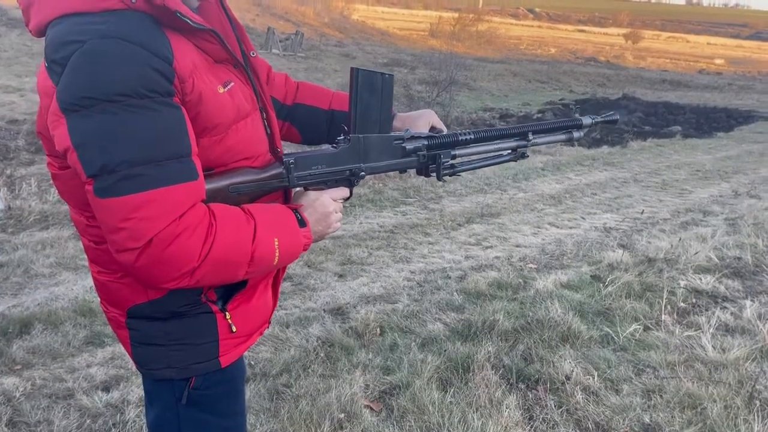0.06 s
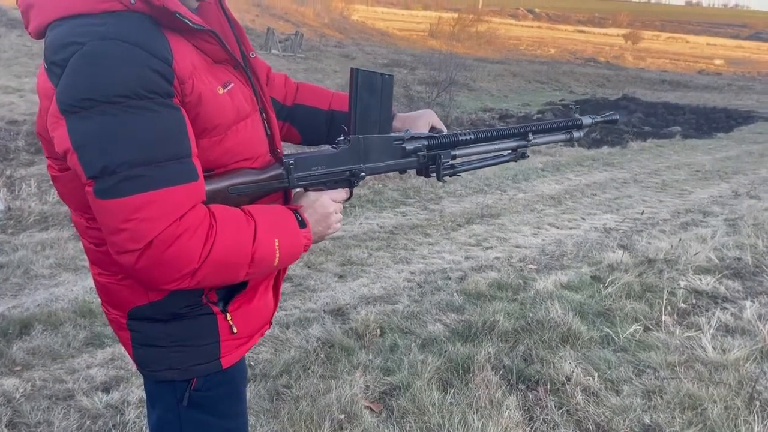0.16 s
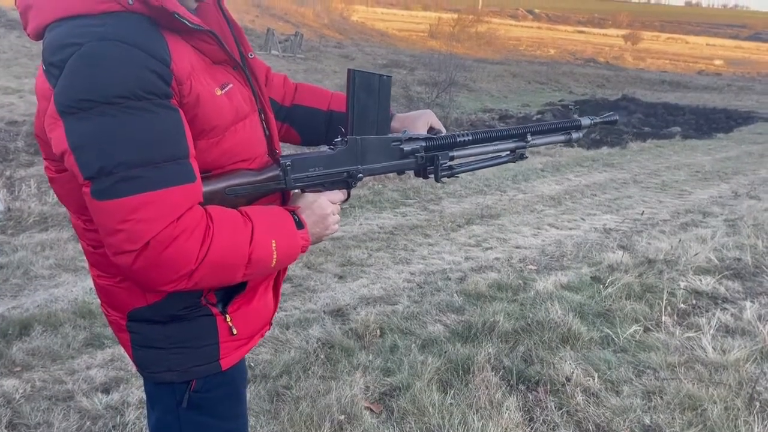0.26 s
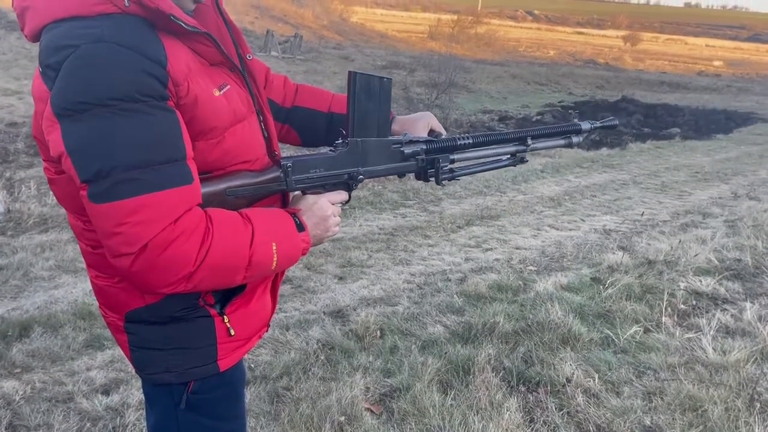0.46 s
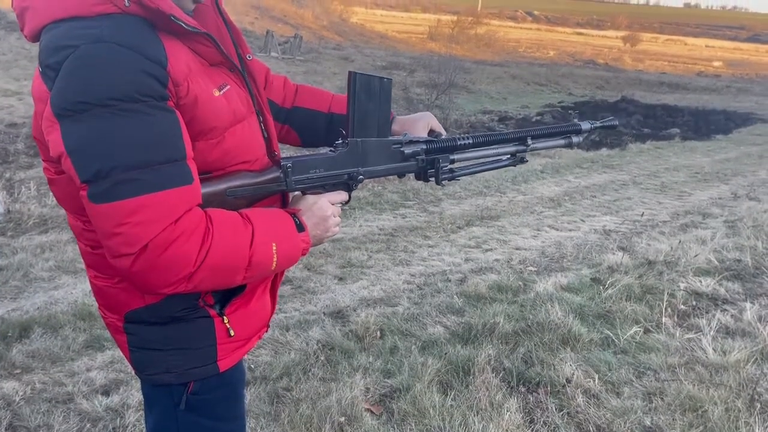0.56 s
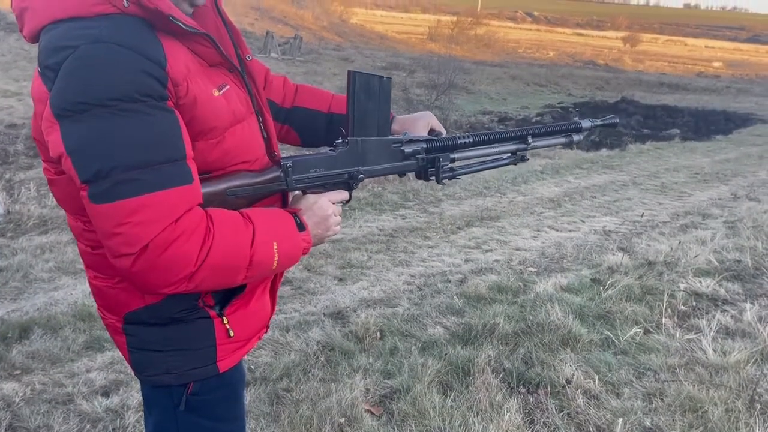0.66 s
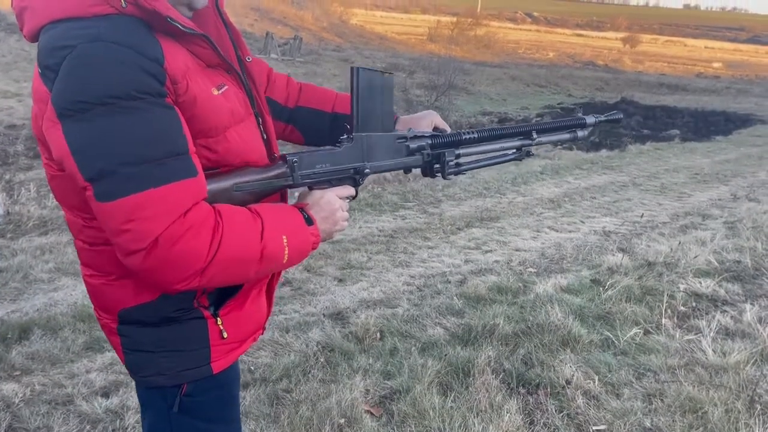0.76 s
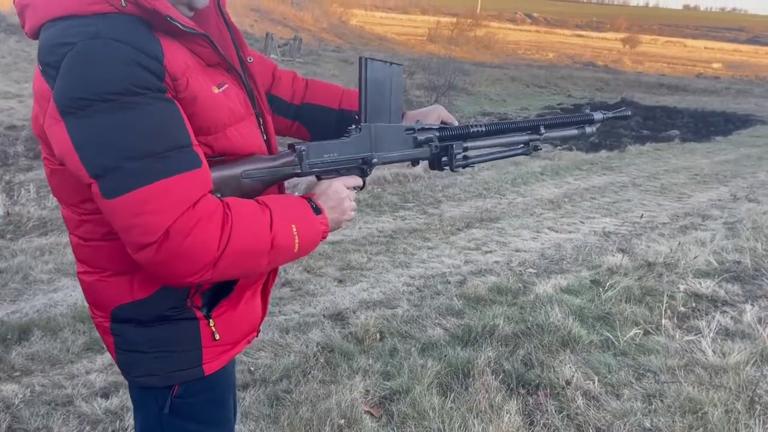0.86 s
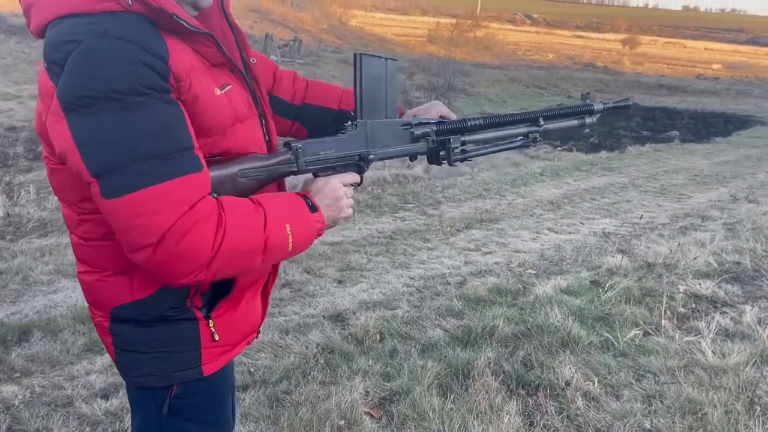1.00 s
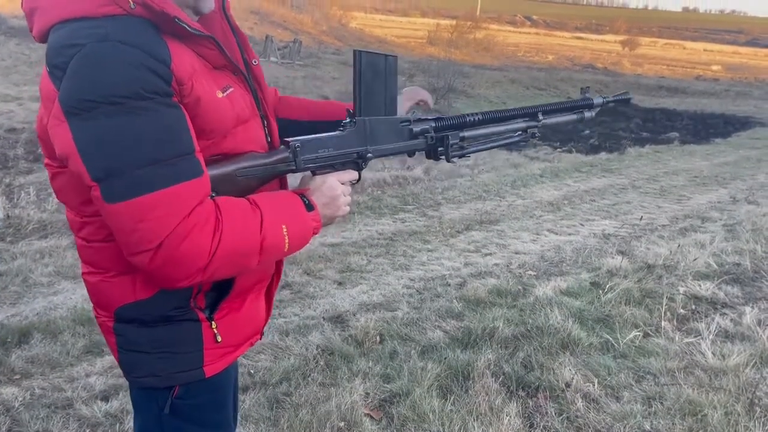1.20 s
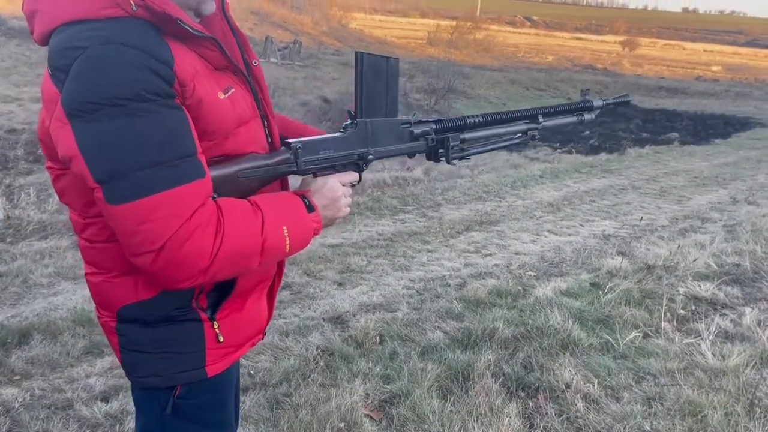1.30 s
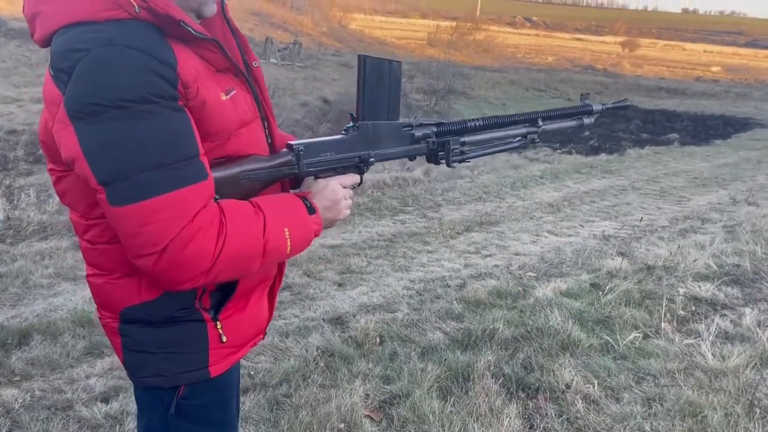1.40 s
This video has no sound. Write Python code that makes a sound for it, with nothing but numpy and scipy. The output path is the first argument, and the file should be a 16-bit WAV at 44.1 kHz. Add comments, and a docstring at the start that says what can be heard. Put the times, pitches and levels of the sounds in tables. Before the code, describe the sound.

A light machine gun fires one close shot, a sharp crack and thump wrapped in steel bolt clatter. A dull echo fades across the open field, a spent case ticks faintly in grass, and wind rumbles on the microphone.

```python
"""Wind rumbles on the microphone in an open field, over the dying echo and ring of an earlier shot.
Close by, a light machine gun fires one round from an open bolt: the sear trips, the bolt runs forward
and locks, and each impact excites the modes of the steel receiver. Expanding gas blasts from the
muzzle and the bolt flies back. Far slopes scatter the shot back, dulled by absorption in the air,
and the spent case ticks faintly in the grass."""
import sys
import numpy as np
from scipy import signal
from scipy.fft import rfft, irfft
from scipy.io import wavfile
from scipy.ndimage import uniform_filter1d, map_coordinates

SR = 44100
rng = np.random.default_rng(int(sys.argv[2]) if len(sys.argv) > 2 else 0)


def store_wav(level_fs):
    """Save 16-bit WAV to argv[1]."""
    pcm = np.round(np.clip(np.atleast_2d(level_fs), -1, 1) * 32767)
    wavfile.write(sys.argv[1], SR, pcm.T.astype(np.int16))


N = 63945

# Rise and decay times are exponential time constants; density_db is a relative level per hertz.
# Course of the wind's rumble: time_s, level_db
GUSTS = [(0, -52), (.1, -51.5), (0.149, -43.5), (0.199, -48.5), (.35, -46), (.47, -47.5), (0.581, -54),
         (0.651, -49), (.76, -48.5), (.82, -64), (0.912, -57), (0.962, -52), (1.04, -61.5), (1.12, -69),
         (1.18, -51.5), (1.29, -49), (1.39, -54), (1.45, -52)]
# Single eddies striking the microphone: start_s, level_db, decay_s, tilt_db_per_octave
BUFFET_HITS = [(.138, -35, 0.01, -1.5), (0.328, -41, 0.033, 3), (0.623, -47.5, .012, -0.5),
               (.654, -52, .02, -6.5), (0.7388, -33, 0.0031, 1), (.748, -37, .007, 0),
               (0.945, -41.5, 0.0071, -8), (0.964, -44.5, .012, -7), (1.148, -43.5, 0.0054, -1),
               (1.181, -50, 0.0076, -10.5), (1.258, -50, 0.0095, 1.5), (1.333, -52, 0.025, 6),
               (1.394, -54, 0.0041, 4), (1.419, -54.5, 0.012, -4.5)]
# Spectra of the rumble, the buffets and the flutter of finer eddies: frequency_hz, density_db
RUMBLE_SPECTRUM = [(20, -14.5), (50, -7), (85, 1.5), (150, -2.5), (220, -7.5), (320, -23.5), (550, -42),
                   (2000, -71)]
BUFFET_SPECTRUM = [(60, -11), (180, -0.5), (350, 4), (500, -2.5), (700, -18.5), (1000, -35.5), (2000, -70)]
FLUTTER_SPECTRUM = [(100, -11.5), (190, -0.5), (300, -5.5), (450, -11), (700, -25.5), (1100, -40),
                    (2000, -61)]
FLUTTER_DB, GUST_DB, FLUTTER_DB_PER_DB = -57.5, -46.5, 1.4  # flutter at this gust level; its growth

# Reflections from the land: delay_s, level_db, rise_s, decay_s, tilt_db_per_octave
REFLECTIONS = [(0.057, -48, .02, .06, 4), (.168, -47, 0.009, .03, -1.5), (.193, -48.5, 0.0185, 0.046, -1),
               (.245, -53, 0.018, 0.093, -2.5), (0.389, -68, 0.0061, .03, -1), (0.599, -76.5, .1, 0.2, -2)]
# Spectrum of the reflections: frequency_hz, density_db
LAND_SPECTRUM = [(100, -9), (200, 1.5), (330, -6), (600, 2), (1080, 4), (1550, -1), (2250, -1.5),
                 (3400, -8), (6000, -12.5), (9000, -11.5), (10200, -31), (11300, -20.5)]
AIR_DB_PER_S_KHZ, PATCH_DB, PATCH_S = 0.5, 2, .008  # absorption; depth and length of uneven patches
EARLIER_SHOT_S, EARLIER_GAIN_DB, SHOT_S = -0.24, 2, .2655

# Impacts in the action: start_s, level_db, attack_s, decay_s, tilt_db_per_octave, left_over_right_db
IMPACTS = [(0.147, -60.5, 0.0041, 0.018, -5.5, 1.5), (0.2013, -33.5, .0006, 0.006, -2, 2.5),
           (0.2134, -19, 0.0007, 0.002, 12.5, -1), (0.2158, -23.5, 0.0024, .003, 1.5, -0.5),
           (0.2231, -33, .001, .003, -0.5, -1.5), (.2284, -29.5, .001, 0.0045, -1.5, 5),
           (.236, -29, .002, .009, -3.5, 1.5), (0.2437, -11.5, 0.0018, 0.0031, 8, 1.5),
           (.2490, -26.5, 0.0013, .0025, 2.5, 2), (0.2948, -29, .001, 0.001, -6, 1),
           (0.306, -26, 0.0018, 0.0036, 2, 3), (0.3175, -36.5, 0.00093, .004, -2.5, 3)]
# Spectrum of steel striking steel: frequency_hz, density_db
STEEL_SPECTRUM = [(200, -14), (700, -9), (2300, -2.5), (3900, -5), (5700, -4), (7200, -3), (9000, -0.5),
                  (10600, -3.5), (11500, -3.5), (12500, -27)]
# Modes of the receiver: pitch_hz, level_db
RECEIVER_MODES = [(1933, -8), (2537, -6.5), (3548, -11.5), (4721, -9.5), (5700, -10.5), (6341, -2.5),
                  (7666, -5.5), (8222, -1.5), (8690, 2.5), (9600, -6.5), (11200, -0.5)]
RECEIVER_DB, RECEIVER_T60_S = -9, .07  # level relative to the impacts
# Thin after-ring of the steel: start_s, level_db
AFTER_RINGS = [(-.28, -56.5), (0.2456, -87.5)]
RING_HZ, RING_T60_S, CONTACT_ATTACK_S = 5360, 1.7, 0.00042

# Spectra of the muzzle's roar and crack: frequency_hz, density_db
ROAR_SPECTRUM = [(150, -21), (330, -12.5), (480, 5), (620, -2), (800, -3), (1050, -2), (1500, -8),
                 (1950, -9.5), (2700, -15), (4000, -23), (9000, -37)]
CRACK_SPECTRUM = [(1500, -21.5), (3000, -1), (4300, -3.5), (6400, 2), (7300, -4), (8400, 6), (10000, -7),
                  (11400, 3.5), (12300, -19.5)]
ROAR_DB, CRACK_DB, SHOCKS_PER_S, SHOCK_SCATTER_DB = -12, -16.5, 5000, 1
# Resonances that bark through the roar: pitch_hz, level_db
BARK_MODES = [(714, -25.5), (1038, -17.5), (1194, -27.5), (1344, -29), (1933, -26.5)]
# Low resonances of the blast: pitch_hz, level_db, decay_s
THUMP_MODES = [(456.2, -12.5, 0.0032), (221.4, -4.5, .007), (183.7, -24, .022), (90, -8, 0.0091)]
THUMP_LAG_CYCLES = 0.84  # the lower the mode, the later it starts
PUSH_LAG_S, PUSH_S, PUSH_DB, PUSH_CUTOFF_HZ = .0075, .0095, -12.5, 86

# Contacts of the case with the grass: start_s, level_db, decay_s, tilt_db_per_octave
CASE_TICKS = [(.833, -68, 0.0058, 3), (0.8742, -49.5, .003, -5), (1.077, -71, 0.0073, -10.5),
              (1.276, -79.5, .004, -6)]
# Spectrum of one contact: frequency_hz, density_db
TICK_SPECTRUM = [(250, -8), (450, -6), (900, 4.5), (2000, -1.5), (3500, 4.5), (5000, -12.5), (12000, -28)]
# Modes of the brass case: pitch_hz, level_db
BRASS_MODES = [(880, 4.5), (1470, 0), (1850, -8), (2420, -7.5), (3050, -3), (3600, -8)]
CASE_RING_DB, CASE_DECAY_S = -13, 0.0089  # level relative to the tick

MUZZLE_LAG_S, ACTION_LAG_S, LAND_LAG_S = .0004, .000048, .00041  # delays at the left microphone port
HISS_DB, MONO_BELOW_HZ, TOP_HZ = -108, 260, 11950


def undb(db):
    """Amplitude ratio of a level in decibels."""
    return 10 ** (np.asarray(db) / 20)


def unit(x):
    """Normalisation to rms 1."""
    return x / np.sqrt(np.mean(x ** 2))


def since(start):
    """Time axis in seconds, zero at start."""
    return np.arange(N) / SR - start


def colour(x, spectrum, tilt_db=0):
    """Filtering by a spectrum tilted per octave; the result has rms 1."""
    hz, db = np.array(spectrum, float).T
    size = 2 ** 16
    octave = np.log2(np.maximum(np.fft.rfftfreq(size, 1 / SR), 1))
    gain = undb(np.interp(octave, np.log2(hz), db + tilt_db * np.log2(hz / hz[0])))
    return unit(irfft(rfft(x, size) * gain)[..., :N])


def pair(mid_side, correlation):
    """Sum and difference of two independent signals give left and right a set correlation."""
    mid, side = mid_side
    return np.sqrt((1 + correlation) / 2) * mid + np.sqrt((1 - correlation) / 2) * side * [[1], [-1]]


def noise(correlation):
    """Partly coherent stereo white noise."""
    return pair(rng.standard_normal((2, N)), correlation)


def pan(db):
    """Gains for a level difference of left over right."""
    return undb(np.array([[db], [-db]]) / 2)


def delay_left(x, lag_s):
    """Path difference: sound from the right reaches the left port late."""
    return np.array([map_coordinates(x[0], [since(lag_s) * SR], mode="nearest"), x[1]])


def steady(x, window_s):
    """Division by the running rms evens out the slow level of a noise."""
    span = int(window_s * SR)
    power = uniform_filter1d(uniform_filter1d(x ** 2, span), span // 2)
    return x / np.sqrt(power + 1e-9)


def strike(start, attack_s, decay_s):
    """Envelope of a damped impact: rounded attack, exponential decay."""
    t = since(start)
    onset = np.sin(np.pi / 2 * np.clip(t / attack_s, 0, 1)) ** 2
    return onset * np.exp(-np.maximum(t - attack_s, 0) / decay_s)


def swell(peak, rise_s, decay_s):
    """Exponential growth to a peak, then exponential decay."""
    t = since(peak)
    return np.exp(np.minimum(t / rise_s, -t / decay_s))


def burst(source, envelope, spectrum, tilt_db=0):
    """Source and filter: an enveloped excitation is coloured and takes the envelope's rms."""
    return colour(source * envelope, spectrum, tilt_db) * np.sqrt(np.mean(envelope ** 2))


def modal_sum(modes, t, channels):
    """Superposition of undamped modes, with random phases in each channel."""
    return sum(undb(db) * np.sin(2 * np.pi * (hz * t + rng.random((channels, 1)))) for hz, db in modes)


def wind():
    """Turbulent pressure on the microphone: rumble, dull buffets and a flutter that grows in gusts."""
    gust_db = np.interp(since(0), *np.array(GUSTS).T)
    rumble = steady(colour(rng.standard_normal(N), RUMBLE_SPECTRUM), window_s=0.042) * undb(gust_db)
    eddies = noise(correlation=0.691)
    buffets = 0
    for start, db, decay, tilt in BUFFET_HITS:
        envelope = strike(start, attack_s=0.00071, decay_s=decay)
        buffets += undb(db) * burst(eddies, envelope, BUFFET_SPECTRUM, tilt)
    flutter_db = FLUTTER_DB + FLUTTER_DB_PER_DB * (gust_db - GUST_DB)
    flutter = colour(noise(correlation=.8), FLUTTER_SPECTRUM) * undb(flutter_db)
    return rumble + flutter + buffets


def echo(shot_s):
    """Diffuse reflection from uneven land; air absorption grows with frequency and path length."""
    patches = undb(PATCH_DB * unit(uniform_filter1d(rng.standard_normal(N), int(PATCH_S * SR))))
    scatter = delay_left(noise(correlation=0.28), LAND_LAG_S) * patches
    returns = sum(undb(db) * swell(shot_s + delay, rise, decay) * colour(scatter, LAND_SPECTRUM, tilt)
                  for delay, db, rise, decay, tilt in REFLECTIONS)
    hz, times, bins = signal.stft(returns, SR, nperseg=256)
    travel_s = np.clip(times - shot_s, 0, 1)
    air = undb(-AIR_DB_PER_S_KHZ * np.outer(hz / 1000, travel_s))
    return signal.istft(bins * air, SR)[1][:, :N] * (since(shot_s) > 0)


def after_ring():
    """Free vibration: one lightly damped mode of the steel lingers after each shot."""
    decay_s = RING_T60_S / np.log(1000)
    envelope = sum(undb(db) * strike(start, CONTACT_ATTACK_S, decay_s) for start, db in AFTER_RINGS)
    return envelope * np.sin(2 * np.pi * RING_HZ * since(0))


def action():
    """Impact excitation: trigger, sear, bolt and cartridge clash and drive the receiver's modes."""
    contact = delay_left(noise(correlation=0.41), ACTION_LAG_S)
    blows = sum(burst(contact, strike(start, attack, decay), STEEL_SPECTRUM, tilt) * undb(db) * pan(side)
                for start, db, attack, decay, tilt, side in IMPACTS)
    t = since(0)[:N // 4]
    impulse_response = modal_sum(RECEIVER_MODES, t, channels=2) * undb(-60 * t / RECEIVER_T60_S)
    ringing = unit(signal.fftconvolve(blows, impulse_response, axes=1)[:, :N])
    return blows + ringing * blows.std() * undb(RECEIVER_DB)


def shocks(correlation):
    """Shot noise: a dense random train of small shock fronts of scattered size."""
    arrivals = rng.random((2, N)) < SHOCKS_PER_S / SR
    fronts = arrivals * undb(SHOCK_SCATTER_DB * rng.standard_normal((2, N)))
    return pair(fronts.mean() - fronts, correlation)


def muzzle_blast():
    """Escaping gas radiates shock fronts, heard as a roar and a crack; resonances bark through them."""
    flow = swell(SHOT_S, rise_s=0.011, decay_s=0.011)
    bark = modal_sum(BARK_MODES, since(SHOT_S), channels=2) * flow
    roar = undb(ROAR_DB) * burst(shocks(correlation=0.67), flow, ROAR_SPECTRUM)
    surge = swell(SHOT_S, rise_s=0.0049, decay_s=0.013)
    crack = undb(CRACK_DB) * burst(shocks(correlation=.2), surge, CRACK_SPECTRUM)
    return delay_left(roar + bark, MUZZLE_LAG_S) * pan(db=-1) + crack


def thump():
    """Damped oscillation: the low resonances of the blast die within a few cycles."""
    pressure = 0
    for hz, db, decay in THUMP_MODES:
        start = SHOT_S + THUMP_LAG_CYCLES / hz
        envelope = strike(start, attack_s=0.00049, decay_s=decay)
        pressure += undb(db) * envelope * np.sin(2 * np.pi * hz * since(start))
    return pressure


def gas_push():
    """Blast wave: the expanding gas cloud gives a slow overpressure, then suction."""
    age = since(SHOT_S + PUSH_LAG_S) / PUSH_S
    wave = (age > 0) * (1 - age) * np.exp(-abs(age))
    return undb(PUSH_DB) * signal.sosfilt(signal.butter(2, PUSH_CUTOFF_HZ, fs=SR, output="sos"), wave)


def spent_case():
    """Contact damping: the brass case ticks as it lands and settles, and grass cuts its ring short."""
    contact = noise(correlation=0.7)
    brass = unit(modal_sum(BRASS_MODES, since(0), channels=1))
    sound = 0
    for start, db, decay, tilt in CASE_TICKS:
        tick = burst(contact, strike(start, CONTACT_ATTACK_S, decay), TICK_SPECTRUM, tilt)
        ring = undb(CASE_RING_DB) * brass * strike(start, CONTACT_ATTACK_S, CASE_DECAY_S)
        sound += undb(db) * (tick + ring)
    return sound


def scene():
    """Linear superposition of echoes, gun, wind, case and a faint hiss."""
    echoes = echo(SHOT_S) + undb(EARLIER_GAIN_DB) * echo(EARLIER_SHOT_S)
    gun = after_ring() + action() + muzzle_blast() + thump() + gas_push()
    return echoes + gun + wind() + spent_case() + undb(HISS_DB) * noise(correlation=.5)


def record(dry):
    """Soft saturation rounds the peaks; filters centre the bass and limit the bandwidth."""
    left, right = np.tanh(dry)
    high_pass = signal.butter(2, MONO_BELOW_HZ, "high", fs=SR, output="sos")
    side = signal.sosfiltfilt(high_pass, (left - right) / 2)
    stereo = (left + right) / 2 + side * [[1], [-1]]
    return signal.sosfilt(signal.ellip(8, .2, 70, TOP_HZ, fs=SR, output="sos"), stereo)


dry = scene()
out = record(dry)
store_wav(out)
```